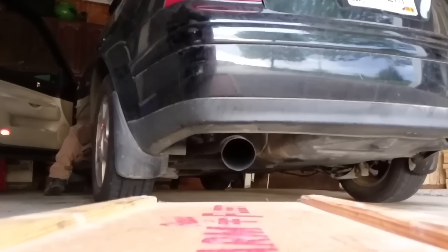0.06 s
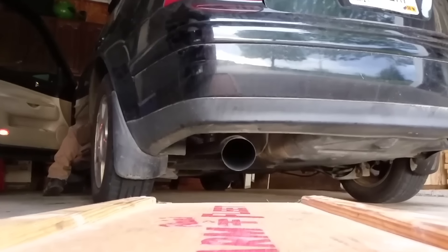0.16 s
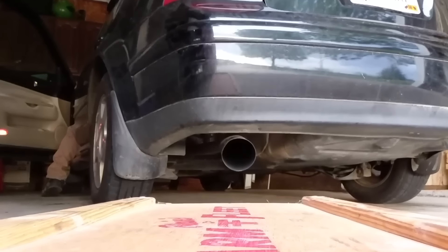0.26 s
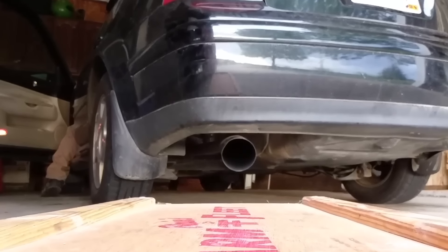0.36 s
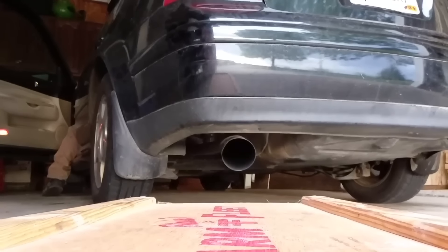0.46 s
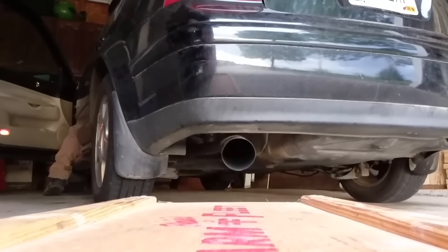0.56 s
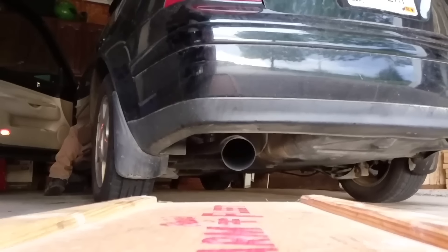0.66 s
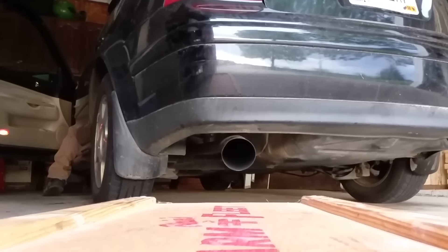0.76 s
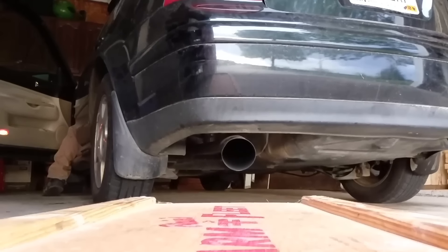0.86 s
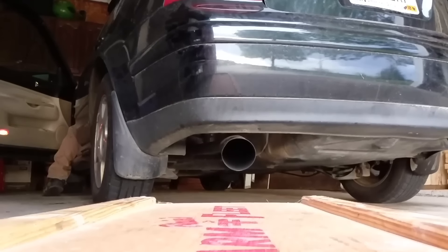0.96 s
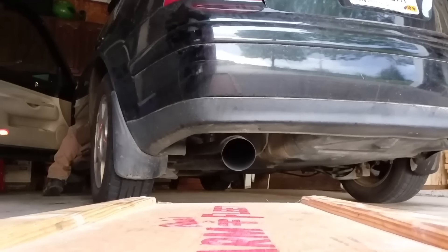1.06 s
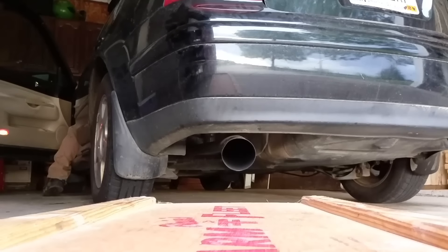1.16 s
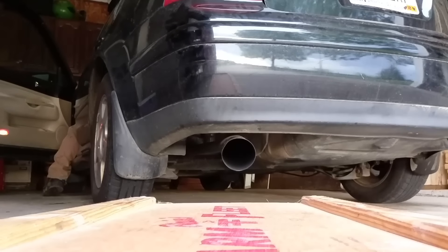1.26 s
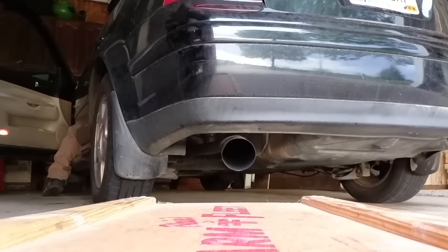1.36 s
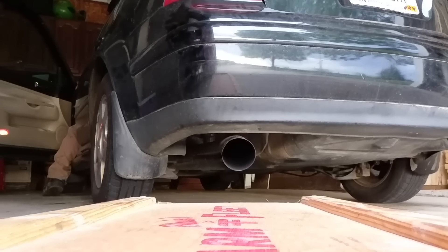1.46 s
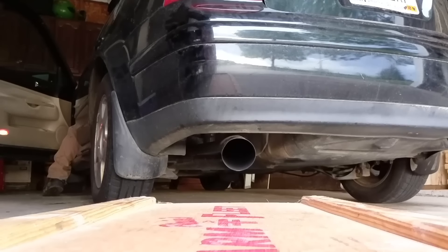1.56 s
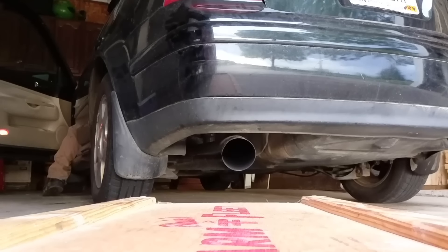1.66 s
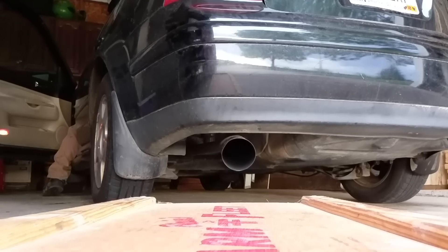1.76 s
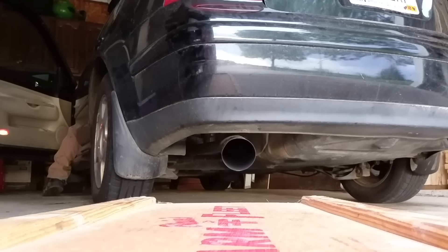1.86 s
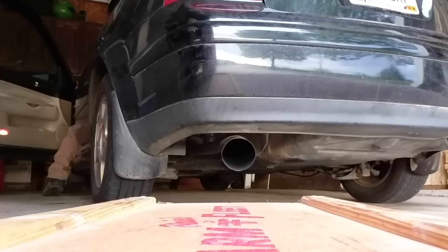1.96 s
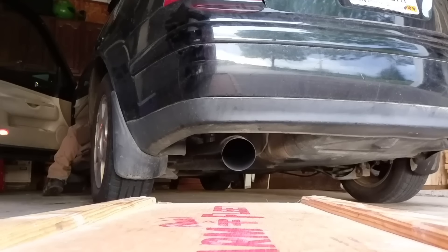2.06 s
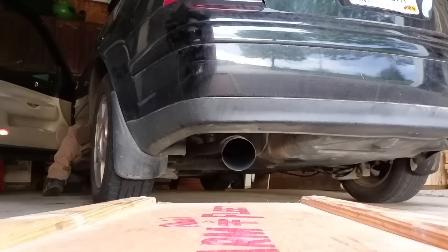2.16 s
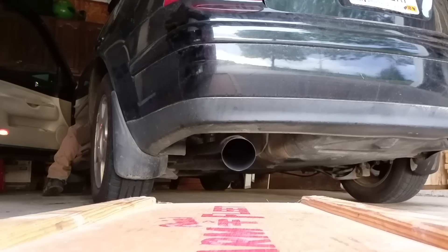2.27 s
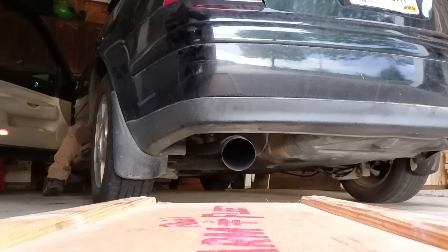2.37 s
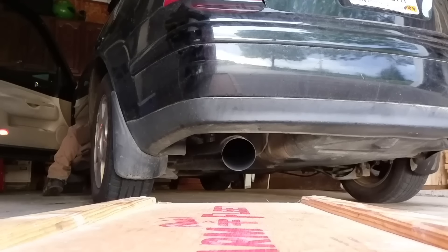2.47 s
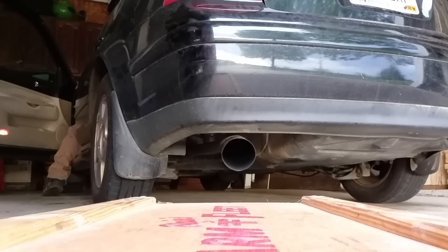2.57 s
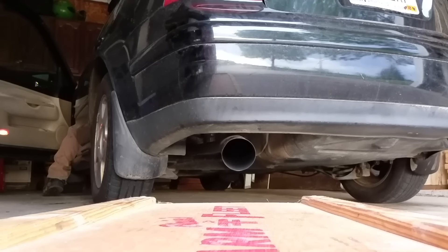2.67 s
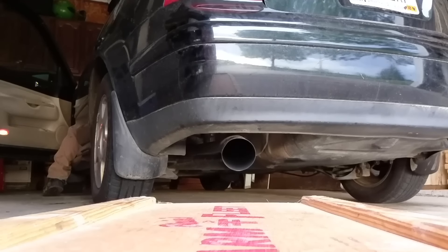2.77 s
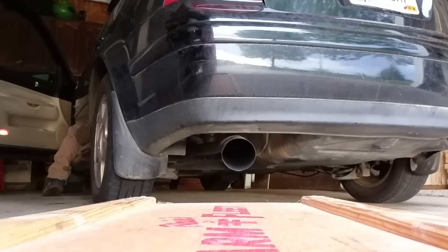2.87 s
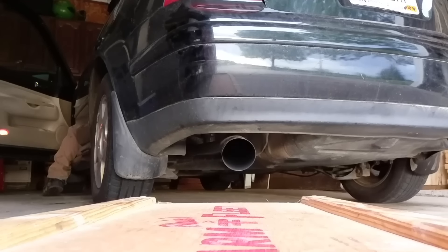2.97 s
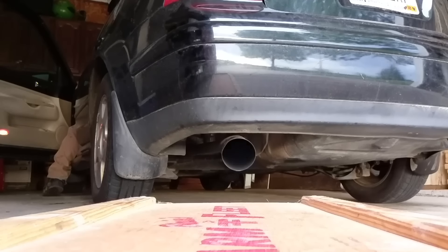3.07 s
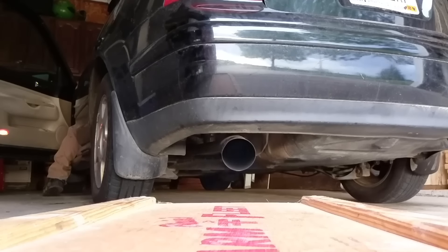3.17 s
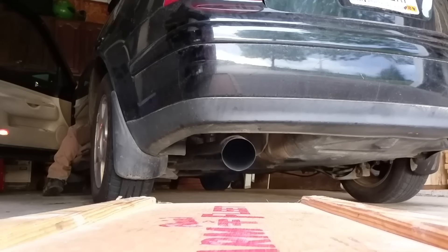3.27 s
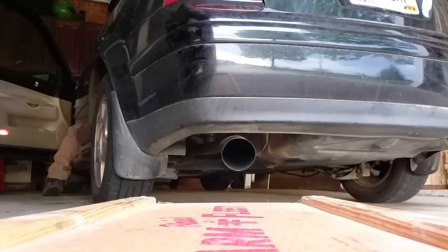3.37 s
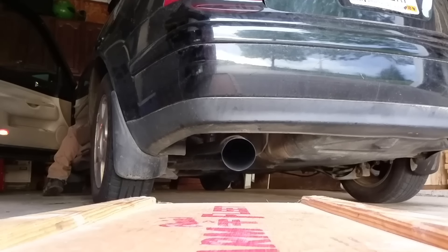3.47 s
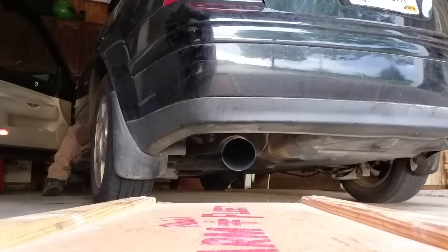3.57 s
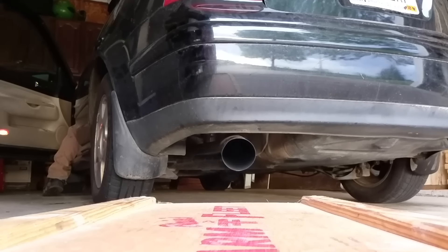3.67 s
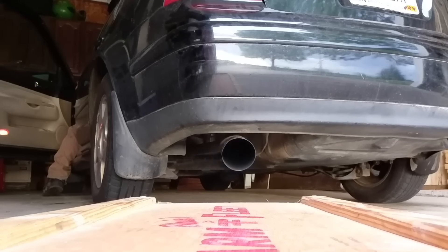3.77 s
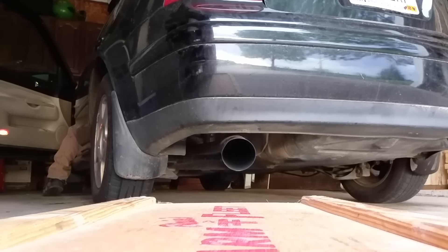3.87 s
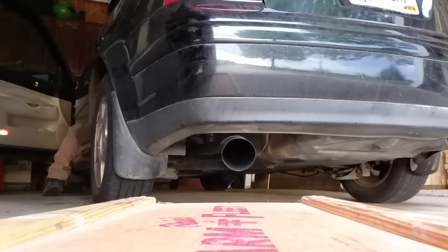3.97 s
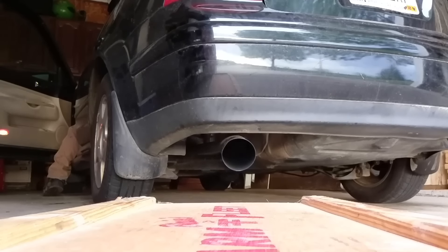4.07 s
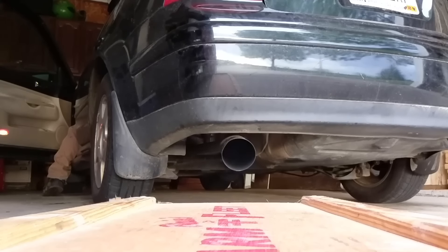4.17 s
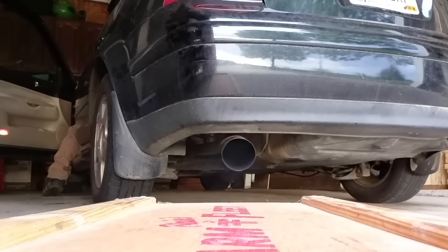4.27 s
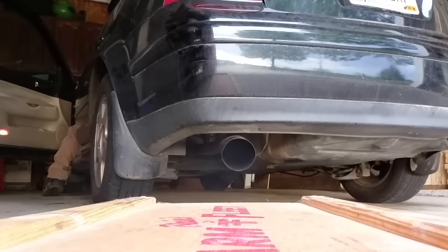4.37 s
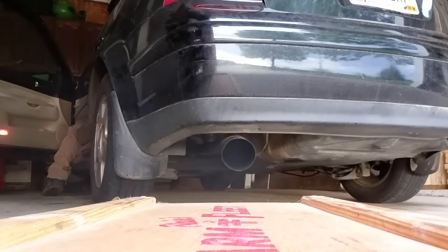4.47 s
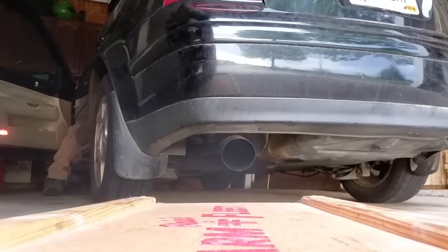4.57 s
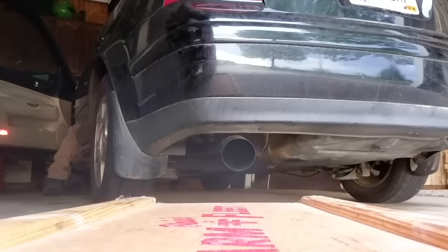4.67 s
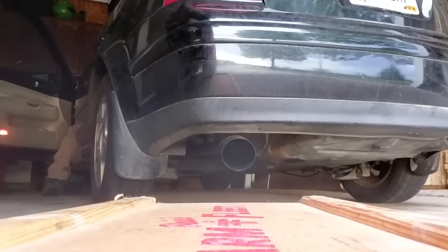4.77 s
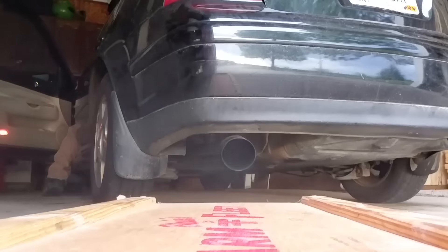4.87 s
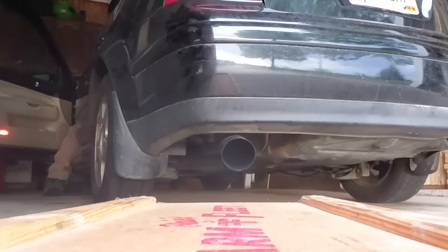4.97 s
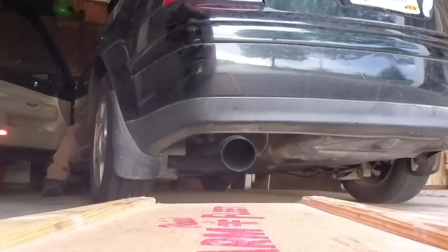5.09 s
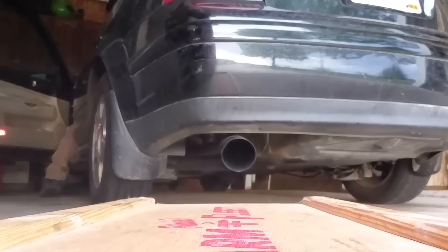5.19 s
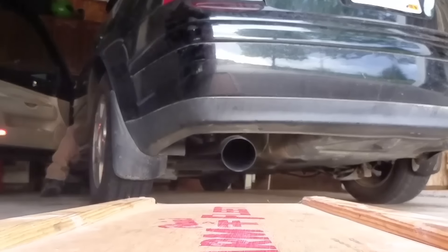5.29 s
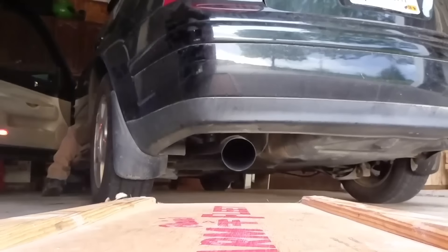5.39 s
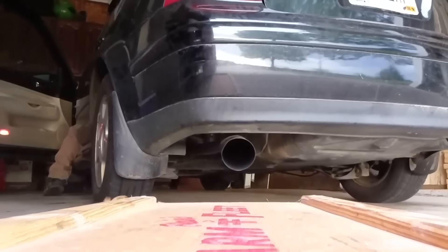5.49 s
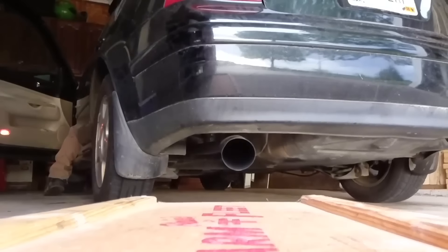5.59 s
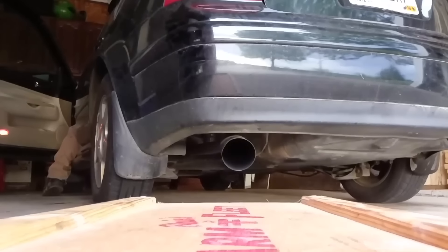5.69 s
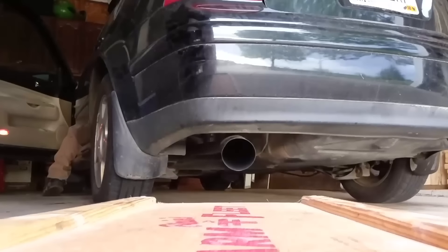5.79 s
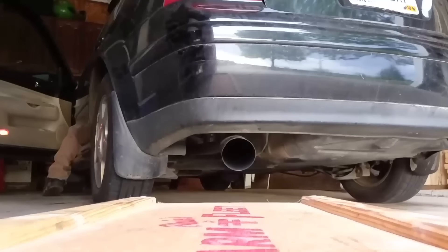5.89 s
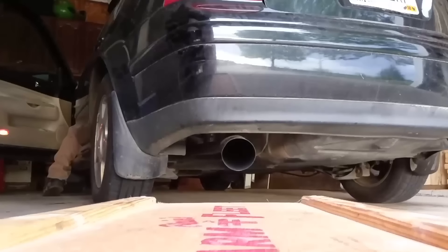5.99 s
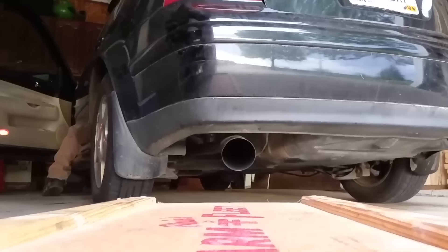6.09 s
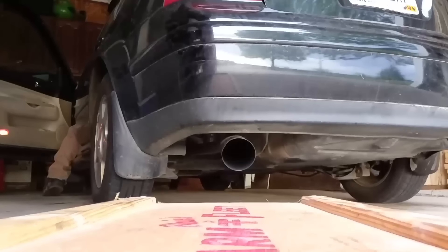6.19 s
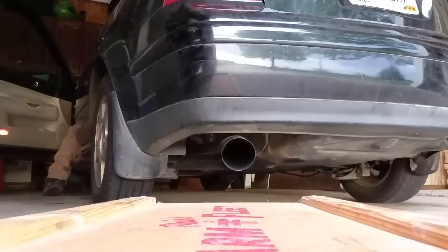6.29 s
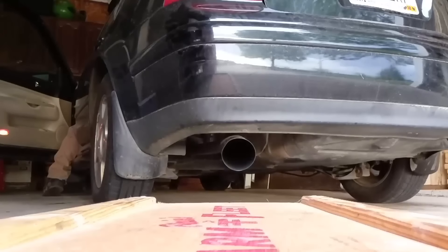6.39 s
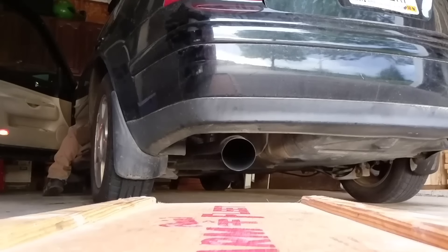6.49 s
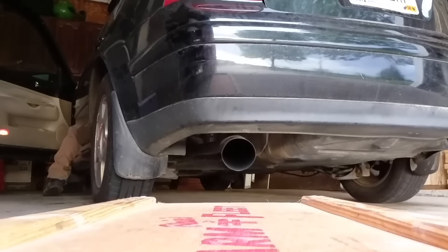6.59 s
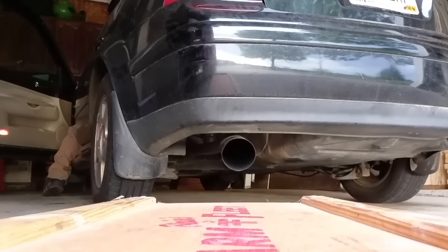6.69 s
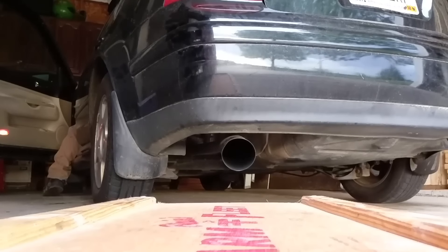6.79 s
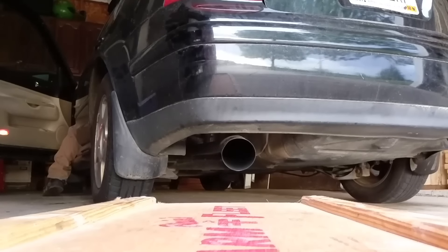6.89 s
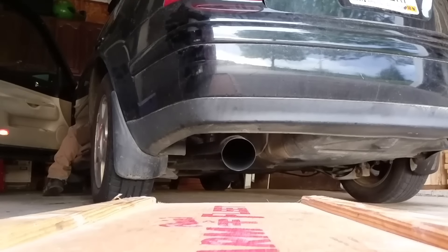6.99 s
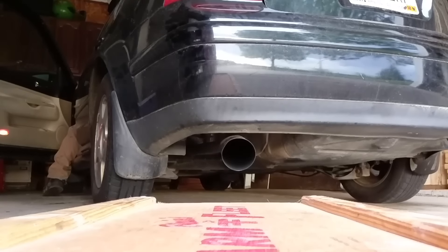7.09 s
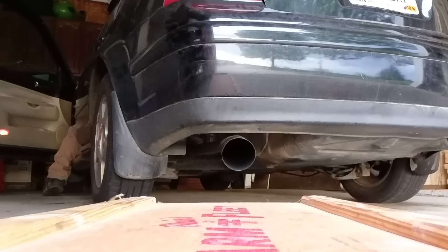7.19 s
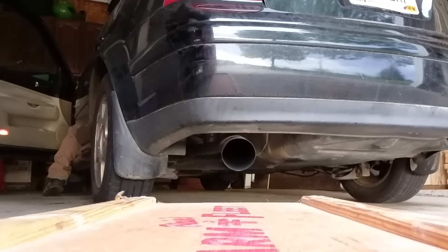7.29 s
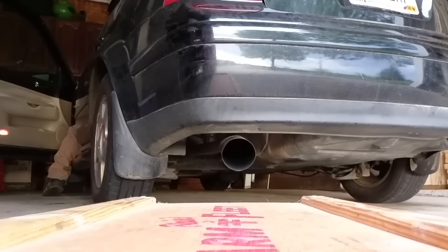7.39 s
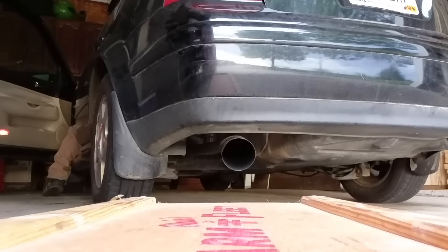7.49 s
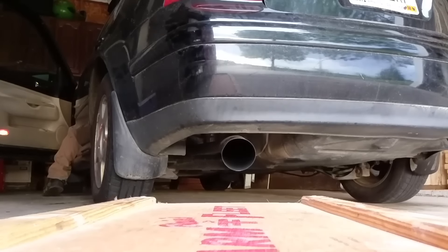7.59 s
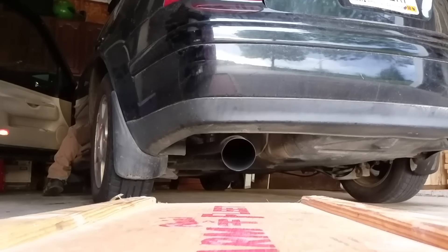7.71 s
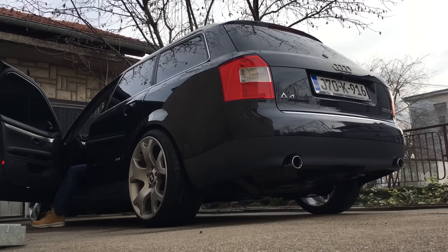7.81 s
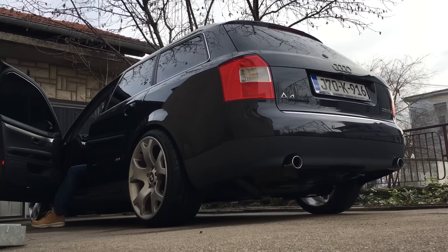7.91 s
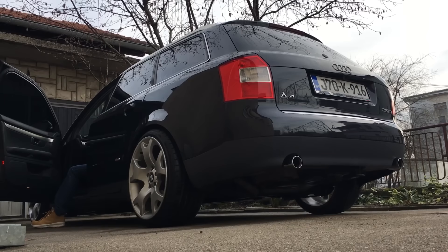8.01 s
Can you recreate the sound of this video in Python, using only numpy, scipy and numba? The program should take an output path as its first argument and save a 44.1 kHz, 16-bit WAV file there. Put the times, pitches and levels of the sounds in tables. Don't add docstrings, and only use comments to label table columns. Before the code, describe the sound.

A diesel idles with a throbbing, hissing exhaust, revs twice as turbo whistle climbs, then howls and moans down to idle before a quiet driveway.

```python
import sys
import numpy as np
from scipy import signal
from scipy.fft import rfft, irfft, next_fast_len
from scipy.io import wavfile
from scipy.ndimage import uniform_filter1d
from numba import njit

SR = 44100
rng = np.random.default_rng(int(sys.argv[2]) if len(sys.argv) > 2 else 0)


def generate_wav(sig):
    pcm = np.round(np.clip(np.atleast_2d(sig).T, -1, 1) * 32767).astype(np.int16)
    wavfile.write(sys.argv[1], SR, pcm)


def field_ratio(decibels):
    return 10 ** (np.asarray(decibels, dtype=float) / 20)


N = 355005
TIME = np.arange(N) / SR
IDLE_HZ, PIPE_DB = 30.9, -21
CUT_S = 7.8592


def unit(x):
    return x / np.sqrt(np.mean(x ** 2))


def columns(table):
    s, *rest = np.transpose(table)
    return [np.interp(TIME, s, c) for c in rest]


def noise():
    return rng.standard_normal(N)


def over_hz(table, count):
    f, *rest = np.transpose(table)
    bins = np.log(np.fft.rfftfreq(count, 1 / SR) + 1)
    return [np.interp(bins, np.log(f), c) for c in rest]


def colour(x, table):
    cepstrum = irfft(np.log(field_ratio(over_hz(table, count=8192)[0])))
    cepstrum[1:4096] *= 2
    cepstrum[4097:] = 0
    return signal.fftconvolve(x, irfft(np.exp(rfft(cepstrum))))[:N]


def split(x, hz, kind, order):
    return signal.sosfilt(signal.butter(order, hz, kind, fs=SR, output="sos"), x)


@njit
def svf(x, hz, width):
    y, b, l = np.empty(len(x)), 0., 0.
    for i in range(len(x)):
        g, k = np.tan(np.pi * hz[i] / SR), width[i] / hz[i]
        v = (b + g * (x[i] - l)) / (1 + g * (g + k))
        b, l, y[i] = 2 * v - b, l + 2 * g * v, k * v
    return y


def band(x, hz, width):
    return svf(x, np.clip(hz, 20, .45 * SR) + 0 * TIME, np.maximum(width, 5) + 0 * TIME)


def walk(rate):
    k = int(SR / rate)
    held = np.repeat(rng.standard_normal(N // k + 1), k)
    return unit(uniform_filter1d(uniform_filter1d(held, k), k)[:N])


def steady(x, share):
    x = unit(x)
    power = uniform_filter1d(uniform_filter1d(x ** 2, size=4000), size=4000)
    return x / power ** (share / 2)


# f/Hz, density level/dB per Hz
YARD = [(41, -47), (70, -8), (124, -20), (212, -17), (254, -16), (425, -35), (1190, -32), (8000, -69),
        (10400, -75), (17600, -120)]
# t/s, level/dB
STARTER = [
    (7.99, -67),
    (8.012, -51),
    (8.022, -29.5),
    (8.031, -23.5),
    (8.04, -29),
    (8.05, -36),
]
# f/Hz, width/Hz, level/dB
STARTER_MODES = [(900, 560, 3), (1690, 470, 6), (2374, 257, 6), (3260, 250, 2), (3815, 134, -1),
                 (7020, 6000, -43)]


def driveway():
    hum = field_ratio(-34.5) * np.sqrt(2) * np.sin(2 * np.pi * 46.54 * TIME + 1.5)
    air = field_ratio(-41.5) * unit(np.array([colour(noise(), YARD) for _ in range(2)]))
    gear = noise()
    rattle = unit(sum(field_ratio(db) * band(gear, f, width) / np.sqrt(width) for f, width, db in STARTER_MODES))
    return hum + air + band(rattle, 2500, 6100) * field_ratio(columns(STARTER)[0])


# t/s, level/dB
BUFFET = [(6.9, -28), (7.2, -31), (7.35, -22.5), (7.45, -29), (7.53, -19), (7.62, -27.5), (7.7, -21),
          (7.86, -35)]


def buffet():
    both, left, right = (band(band(noise(), 55, 160), 66, 140) for _ in range(3))
    octaves = np.log2(columns(ENGINE)[0] / IDLE_HZ)
    level_db = columns(BUFFET)[0] - 7 * octaves + 0.83 * walk(25)
    return unit(both + 0.47 * np.array([left, right])) * field_ratio(level_db)


# f/Hz, left minus right level/dB, left lead/rad, likeness 0-1
PORTS = [(300, .2, .1, .993), (800, 3, .5, .9), (1050, 1.5, 0, .5), (1500, -3, -4, .35),
         (2150, 5.5, -6.2, .4), (2700, 1.5, -6.2, .88), (4150, -2, -6.3, .8), (4800, -1.5, -6, .25),
         (6100, -3, -5.5, .35), (6800, -14, -4.3, .3), (8200, -5, -3, .82), (9800, 13, -2.5, .65),
         (11500, 7, -3.8, .3), (13500, -1, -5, .25)]


def ports(x, echo=.45, t60=.15):
    count = next_fast_len(N + SR)
    balance_db, lead, like = over_hz(PORTS, count=count)
    upper = split(x, 200, "high", order=2)
    frames = signal.stft(upper, nperseg=512)[2]
    turned = frames * np.exp(2j * np.pi * rng.random((2, *frames.shape)))
    scatter = unit(signal.istft(turned)[1][:, :N]) * np.std(upper)
    tails = rng.standard_normal((2, SR // 4)) * np.exp(-np.log(1000) * TIME[:SR // 4] / t60)
    tails = tails / np.sqrt(np.sum(tails ** 2, axis=1, keepdims=True))
    echoes = signal.fftconvolve(x[None], tails, axes=1)[:, :N]
    scatter = np.sqrt(1 - echo) * scatter + np.sqrt(echo) * echoes
    side = np.array([[1], [-1]])
    gain = field_ratio(side * balance_db / 2)
    direct = np.sqrt(like) * np.exp(.5j * side * lead) * rfft(x, count)
    heard = direct + np.sqrt(1 - like) * rfft(scatter, count)
    centre = np.sqrt(np.sum(gain ** 2, axis=0) + 2 * like * np.cos(lead)) / 2
    return irfft(gain * heard / centre, count)[:, :N]


# f/Hz, width/Hz, level/dB
ORGAN = [(437, 33, -17), (557.6, 8.4, -5), (675, 29, -9), (887, 29, -5.5), (1111, 20, -4.5),
         (1030, 33, -18), (1210, 14, 2), (1560, 89, 3)]


def organ(x, through):
    return through * x + sum(field_ratio(db) * band(x, f, width) for f, width, db in ORGAN)


def tone(table, flutter_db, rate):
    hz, db, width = columns(table)
    breathy = band(band(noise(), hz, width), hz, width) / np.sqrt(np.maximum(width, 5) / SR * np.pi / 2)
    core = np.sqrt(2) * np.sin(2 * np.pi * np.cumsum(hz + .45 * width * walk(150)) / SR)
    firm = np.clip(.72 - width / 700, 0, 1)
    inside = uniform_filter1d(1. * (TIME >= table[0][0]) * (TIME <= table[-1][0]), size=800)
    mixed = np.sqrt(firm) * core + np.sqrt(1 - firm) * breathy
    return mixed * inside * field_ratio(db + flutter_db * walk(rate))


# f/Hz, level/dB
COAST_LEVEL = [(4600, -60), (5500, -46), (8400, -39), (9100, -25), (9900, -16.5), (10600, -32),
               (12400, -36), (16900, -63)]


def coast(start, top_hz, run_down, db):
    rest_hz = 4477
    s = np.arange(start, start + 3, 1 / 50)
    hz = rest_hz + (top_hz - rest_hz) * np.exp(-(s - start) / run_down)
    level_db = np.interp(hz, *np.transpose(COAST_LEVEL)) + db
    return np.transpose([s, hz, level_db, 78.6 + .04 * (hz - rest_hz)])


# start t/s, f/Hz, time constant/s, level/dB
COASTS = [
    (-.1, 9950, .88, 2.5),
    (5.56, 15740, 1.015, 1.1),
]
# t/s, f/Hz, level/dB
SPOOLS = [
    [(2.75, 4580, -70), (2.93, 5060, -31), (3.05, 6200, -26), (3.14, 7550, -21.5), (3.24, 10070, -16.5),
     (3.4, 11500, -30), (3.55, 12200, -35.5), (3.86, 11700, -44)],
    [(3.86, 11610, -34), (3.96, 11860, -26), (4.08, 13300, -30), (4.2, 15230, -38), (4.3, 16840, -59)],
]


def whistle():
    spools = [[(s, hz, db, 0.13 * hz) for s, hz, db in spool] for spool in SPOOLS]
    return sum(tone(track, flutter_db=1, rate=40) for track in [coast(*row) for row in COASTS] + spools)


def moan(s, length, hz, db, width):
    rise, fade_db = 0.38 * length, 18
    return [(s - rise, hz, db - fade_db, width), (s, hz, db, width),
            (s - rise + length, hz, db - fade_db, width)]


# t/s, f/Hz, level/dB, width/Hz
SHAFT = [(4.9, 1700, -33.5, 246), (5.1, 1563, -31.5, 250), (5.45, 1447, -32.5, 203.8),
         (5.75, 1147, -20.5, 204.6), (6.1, 1013, -20.5, 149.8), (6.3, 827, -27.5, 150),
         (6.45, 702.7, -19.5, 121.5), (6.7, 614.4, -22, 95.2), (7, 544, -34.5, 75)]
# t/s, f/Hz, level/dB, width/Hz
WHIRL = [(4.6, 1156, -31, 300.4), (4.95, 939.4, -15.5, 253), (5.15, 776.3, -12.5, 155.2),
         (5.35, 675, -8, 50.14), (5.6, 654.3, -12, 61), (5.85, 616.4, -9, 120.9),
         (6.201, 564.6, -12.5, 110.4), (6.3, 424, -22.5, 100.3), (6.5, 399, -28.5, 100.3)]
# loudest t/s, length/s, f/Hz, level/dB, width/Hz
MOANS = [(2.93, .2, 560, -21.5, 580), (3.07, 0.083, 600, -17, 350), (4.15, 0.58, 560, -18, 170),
         (4.42, 1.24, 635, -14, 197), (4.7, .4, 1130, -23, 290), (6.65, 0.83, 300, -24, 29.28),
         (.3, .9, 300, -24.5, 27), (0.02, 0.42, 420, -24.5, 95), (0.57, 0.36, 555, -26, 50),
         (4.55, 1.1, 14300, -42, 2500), (5.45, .9, 14500, -45, 2500), (4.6, 1.1, 5000, -39, 1400),
         (5.02, 0.99, 11640, -27, 1500)]
# t/s, restart level/dB, depth 0-1
STALLS = [(5.349, -7, 0.95), (5.394, -4, 0.68), (5.483, -2, 0.8), (5.565, -4, 0.99), (5.782, -4, 0.98),
          (5.992, 4, 0.88), (6.014, -18, 1)]


def turbo():
    sag_s, restart_s = .022, 0.011
    earlier = [(s - 6.41, hz, db + 1.4, width) for s, hz, db, width in SHAFT]
    tracks = [SHAFT, WHIRL, earlier, *(moan(*row) for row in MOANS)]
    howl = sum(tone(track, flutter_db=0.3, rate=22) for track in tracks)
    for s, db, depth in STALLS:
        since = np.abs(TIME - s)
        sag = 1 - depth * np.exp(-since / sag_s)
        kick = 1 + field_ratio(db) * np.exp(-since / restart_s)
        howl = howl * uniform_filter1d(np.where(TIME < s, sag, kick), size=60)
    return 1.067 * organ(howl, through=0.62)


# t/s, firing rate f/Hz, load level/dB over idle, gas flow level/dB over idle
ENGINE = [(0, 32.84, 0.5, 2), (1.0, 30.18, 0.5, 0.5), (2.75, 29.8, 2, 1), (2.81, 32.63, 7, 6.5),
          (2.98, 45.25, 8, 6), (3.17, 68.8, 8.5, 5.5), (3.3, 82.6, 9, 5), (3.55, 74.8, 11.5, 6),
          (3.9, 56.56, 8.5, 3), (4.12, 79.1, 11, 5.5), (4.35, 113.2, 10, 5.5), (4.55, 132.5, 9, 2),
          (4.75, 130, 7.5, -0.5), (5.23, 89.5, 6, 3), (5.56, 66.7, 6, 2.5), (6.02, 42.1, 5.5, 1.5),
          (6.3, 35.85, -1.5, 2), (7.86, 30.6, -1, 0.5)]
# t/s, level/dB, length/s
SURGES = [(.07, 0.5, .05), (2.915, 2, 0.036), (3.08, 2, .03), (3.223, -5.5, 0.05), (3.438, 3, 0.058),
          (3.938, 5, 0.046), (4.024, -1.5, 0.025), (4.129, 1, 0.07), (4.275, -4.5, 0.02),
          (4.359, 0.5, 0.034), (4.66, -4.5, 0.028), (4.952, -1, .02), (5.84, 2.5, 0.024), (6.02, -1, .03)]
# firing rate f/Hz, level/dB
FIRING_TONE = [(30, -42), (45, -49), (60, -26), (70, -25), (78, -18.5), (90, -23), (102, -21), (130, -12.5)]


def controls():
    hz, load_db, flow_db = columns(ENGINE)
    hz = uniform_filter1d(hz, size=2500)
    flow_db = flow_db + sum(db * np.exp(-.5 * ((TIME - s) / length) ** 2) for s, db, length in SURGES)
    octaves = np.log2(hz / IDLE_HZ)
    keep = np.exp(-1 / SR / 0.29)
    hanging = np.maximum(octaves, signal.lfilter([1 - keep], [1, -keep], octaves))
    climb = np.clip(uniform_filter1d(np.gradient(octaves) * SR, size=4000), -1, 3)
    tone_db = np.interp(hz, *np.transpose(FIRING_TONE))
    return hz, dict(
        pipe=PIPE_DB + load_db,
        hiss=-32 + flow_db,
        treble=-37.5 + 1.66 * flow_db + 0.75 * octaves,
        rumble=-32.5 + 0.72 * flow_db + 8 * hanging,
        tone=tone_db + 0.24 * load_db + 0.58 * flow_db - 3 * climb,
        bark=-15.5 + 1.84 * load_db + 2 * climb,
        boom=6 * np.maximum(-climb, 0))


CYLINDERS_DB = [-0.49, -1.1, -0.0038, -2]


def firings(hz):
    phase = np.cumsum(hz * (1 + 0.004 * walk(25))) / SR
    firing, part = phase.astype(int), phase % 1
    uneven_db = np.array(CYLINDERS_DB)[firing % 4] * np.sqrt(hz / 30)
    return part, field_ratio(uneven_db + 0.73 * rng.standard_normal(2000)[firing])


# f/Hz, level/dB
PIPE = [(25, -21), (58, -19.5), (78, -16.5), (97, -21), (127, 5.5), (152, -9.5), (180, 4.5), (215, -2.5),
        (235, -19), (268, -4.5), (325, -20), (390, -13.5), (520, -26.5), (900, -47.5)]


def pipe_ring(hz, db, part, size, puff_s=0.00039):
    age = part / hz / puff_s
    pipe = colour(size * age * np.exp(-age), PIPE)
    pipe = pipe - uniform_filter1d(pipe, size=4000)
    beat = band(pipe, hz, 0.91 * hz)
    upper = pipe - beat
    bark_gain = field_ratio(db["bark"] + np.clip(0.13 * (hz - 60), -9, 5)) - 1
    bark = bark_gain * band(upper, 281, 91)
    boom = (field_ratio(db["boom"]) - 1) * band(upper, 2 * hz, 0.65 * hz)
    orders = steady(upper + boom + bark, 0.4)
    low = field_ratio(db["pipe"]) * orders + field_ratio(db["tone"]) * steady(band(beat, hz, 0.42 * hz), 0.85)
    return low - 0.55 * np.clip(hz / IDLE_HZ - 1.3, 0, 1) * band(low, 0.48 * hz, .5 * hz)


# f/Hz, density level/dB per Hz
HISS = [(880, -29), (1500, 0.5), (1990, -10), (2370, 0), (2860, 1.5), (3830, -5.5), (4390, -19.5),
        (5450, -26), (6010, -24.5), (7090, -14.5), (8540, -16.5), (9700, -11), (11400, -23), (14300, -35.5),
        (15500, -51)]
# f/Hz, density level/dB per Hz
RUMBLE = [(140, -56.5), (230, -5), (260, -13), (339, -22.5), (481, -17.5), (656, -10), (824, -23),
          (1050, -13.5), (1540, -31.5), (1890, -32.5), (2200, -28), (2860, -81), (4840, -120)]


def gas_rush(hz, db, gate, low):
    gas = colour(noise(), HISS)
    treble = split(gas, 5000, "high", order=4)
    hiss = split(gas, 5000, "low", order=4)
    rumble = organ(colour(noise(), RUMBLE), through=0.84)
    rumble = rumble - 0.53 * np.clip(hz / IDLE_HZ - 1.2, 0, 1) * band(rumble, 1090, 540)
    inner = gate ** 0.35 * (unit(hiss) * field_ratio(db["hiss"]) + unit(rumble) * field_ratio(db["rumble"]))
    loudness = uniform_filter1d(low ** 2, size=3000) / field_ratio(2 * PIPE_DB)
    duck = (loudness + 1e-3) ** -.075
    return duck * (inner + gate * unit(treble) * field_ratio(db["treble"]))


def engine():
    hz, db = controls()
    part, size = firings(hz)
    throb = 1 + 15 / hz * np.cos(2 * np.pi * (part - .85))
    gate = np.sqrt(size) * throb * field_ratio(.5 * walk(30))
    low = pipe_ring(hz, db, part, size)
    return low + gas_rush(hz, db, gate, low) + gate * whistle()


def scene():
    garage = ports(engine() + turbo()) + buffet()
    return np.where(TIME < CUT_S, garage, driveway())


def top_cut(x):
    return signal.sosfilt(signal.butter(12, 15770, fs=SR, output="sos"), x)


def record(dry):
    doubled = signal.resample_poly(dry, 2, 1, axis=1)
    rounded = signal.resample_poly(np.tanh(doubled / 0.96), 1, 2, axis=1)
    return top_cut(0.94 * rounded)


dry = scene()
out = record(dry)
generate_wav(out)
```